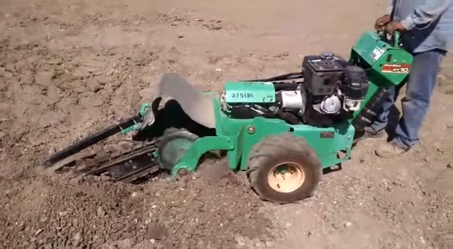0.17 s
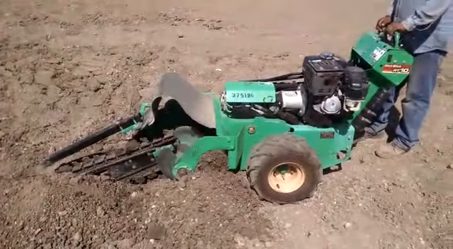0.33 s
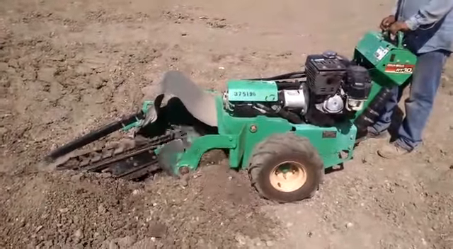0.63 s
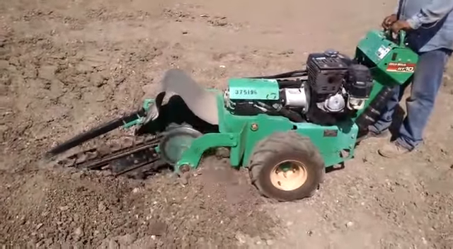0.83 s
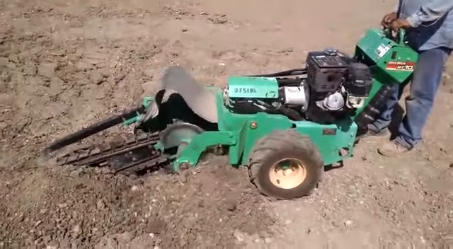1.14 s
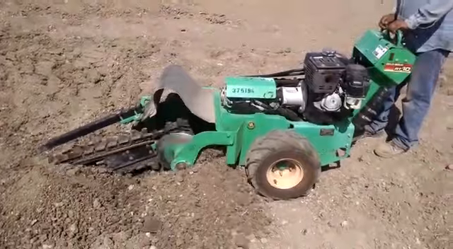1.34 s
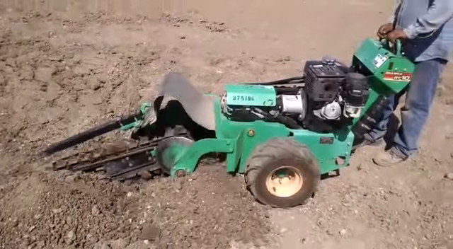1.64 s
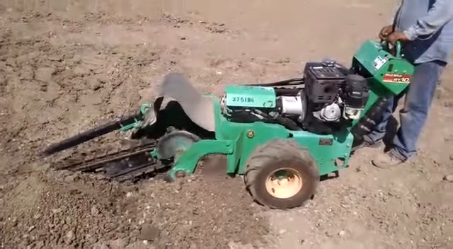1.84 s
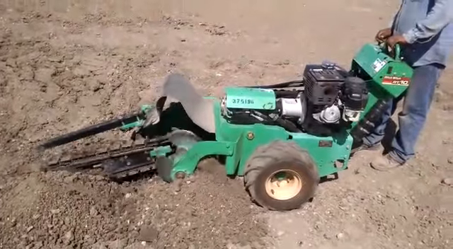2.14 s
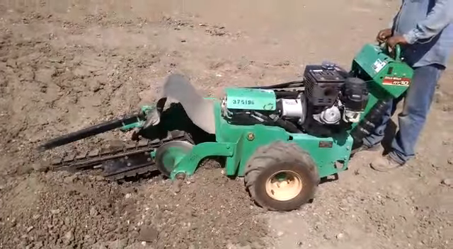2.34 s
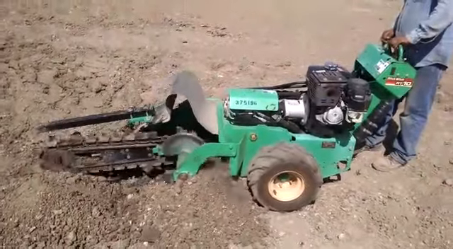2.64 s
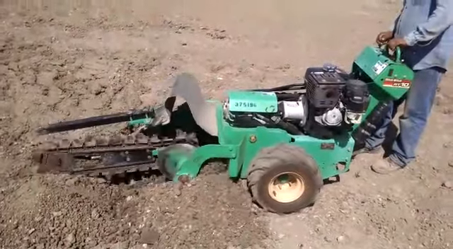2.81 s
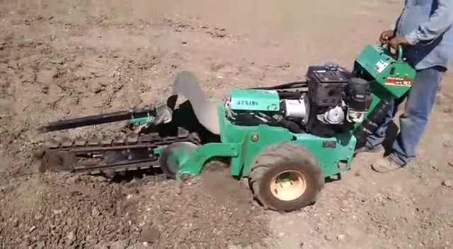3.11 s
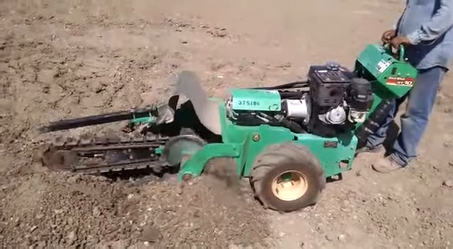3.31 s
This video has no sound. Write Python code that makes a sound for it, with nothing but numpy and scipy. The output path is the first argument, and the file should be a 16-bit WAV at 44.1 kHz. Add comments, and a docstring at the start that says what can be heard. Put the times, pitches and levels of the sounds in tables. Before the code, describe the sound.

Close outdoor stereo pickup of a trencher: rough, throaty small-engine putter throughout, metallic chain clatter and jingling links, brief tooth scrapes early, then wind rumble and pops around two seconds, engine surging near three.

```python
"""A single-cylinder four-stroke engine hunts in speed on a walk-behind trencher working in dry soil:
kicks timed by the engine cycle ring a muffler response, over a drone of low firing-rate multiples.
Shaped noise makes casing rasp, valve ticks, chain rattle and tooth scrapes; decaying sines make
the jingle of loose links and the clinks of stones. Low noise and short pressure pulses make wind
that buffets two close microphone ports in nearly opposite phase."""
import sys
import numpy as np
from scipy import signal
from scipy.fft import rfft, irfft, next_fast_len
from scipy.io import wavfile
from scipy.ndimage import uniform_filter1d, minimum_filter1d, map_coordinates

SR = 44100
rng = np.random.default_rng(int(sys.argv[2]) if len(sys.argv) > 2 else 0)


def wav_out(sig):
    """Save sig, one row per channel (or a flat mono array), as 16-bit PCM at SR to the path in sys.argv[1]."""
    wavfile.write(sys.argv[1], SR, np.round(np.clip(np.atleast_2d(sig).T, -1, 1) * 32767).astype(np.int16))


N = 153027


def amp(db):
    """Decibels to gain."""
    return 10 ** (np.asarray(db) / 20)


def unit(x):
    """Scale to rms 1."""
    return x / np.sqrt(np.mean(x ** 2) + 1e-20)


def along(points, hz):
    """Interpolate (Hz, value) points on a log frequency axis."""
    f, v = np.transpose(points)
    return np.interp(np.log(hz + 1), np.log(f + 1), v)


def curve(rows):
    """Interpolate (s, value) points to one value per sample."""
    return np.interp(np.arange(N) / SR, *np.transpose(rows))


def filtered(x, response):
    """Multiply the spectrum of x by a complex response of frequency."""
    m = next_fast_len(N + SR // 2)
    spectrum = rfft(x, m) * response(np.fft.rfftfreq(m, 1 / SR))
    return irfft(spectrum, m)[..., :N]


def shaped(x, points):
    """Filter x by a (Hz, dB) curve."""
    return filtered(x, lambda hz: amp(along(points, hz)))


def minimum_phase(points, size=8192):
    """Causal impulse response with the given (Hz, dB) spectrum, by cepstral folding."""
    cepstrum = irfft(np.log(amp(along(points, np.fft.rfftfreq(size, 1 / SR)))))
    cepstrum[1:size // 2] *= 2
    cepstrum[size // 2 + 1:] = 0
    return irfft(np.exp(rfft(cepstrum)))


def impulses(times_s, gains):
    """Single-sample kicks at the given times."""
    at = np.round(times_s * SR).astype(int)
    inside = (at >= 0) & (at < N)
    return np.bincount(at[inside], gains[inside], N)


def bumps(rows):
    """Gaussian swells, one per row of (centre s, level dB, half length s)."""
    t = np.arange(N) / SR
    return np.array([amp(db) * np.exp(-((t - s) / half_s) ** 2) for s, db, half_s in rows])


def fading(kicks, life_s):
    """Power envelope of kicks, falling to 1/e in life_s."""
    return signal.lfilter([1], [1, -np.exp(-1 / (life_s * SR))], kicks ** 2)


def wobble(knots_per_s):
    """Smooth random curve."""
    return map_coordinates(rng.standard_normal(1000), [np.arange(N) * knots_per_s / SR], mode="wrap")


def patchy(pair, depth_db):
    """Random gain patches, a few hundred Hz wide and some 40 ms long, alike on both sides."""
    z = signal.stft(pair, nperseg=512)[2]
    field = uniform_filter1d(rng.standard_normal(z.shape[1:]), size=4, axis=0)
    field = uniform_filter1d(field, size=7, axis=1)
    return signal.istft(z * amp(depth_db * unit(field)), nperseg=512)[1][:, :N]


# left-right likeness of machine noise: (frequency [Hz], likeness [-1..1])
MACHINE_LIKENESS = [(300, 0.5), (1200, 1), (2100, 0.7), (2650, 1), (3300, 0.42), (5000, 0.35),
                    (10000, 0.31)]


def noise_pair(likeness):
    """Left and right white noise whose likeness depends on frequency, from a mid and a side part."""
    def mid_side_gains(hz):
        turn = np.arccos(np.clip(along(likeness, hz), -1, 1)) / 2
        return np.array([np.cos(turn), np.sin(turn)])

    mid, side = filtered(rng.standard_normal((2, N)), mid_side_gains)
    return np.array([mid + side, mid - side])


# (frequency [Hz], left minus right [dB])
BALANCE = [(150, 14), (400, 3.5), (800, -2.5), (1250, -1), (1650, 2.5), (2400, 1), (3400, -2), (6000, -3),
           (9000, -3), (13000, -10)]


def placed(sound):
    """Left-right balance of the machine, by frequency."""
    return filtered(sound, lambda hz: amp(np.outer([.5, -.5], along(BALANCE, hz))))


# engine speed: (time [s], firing rate [1/s])
SPEED = [(0.0, 24.155), (0.131, 24.752), (0.324, 26.534), (0.483, 23.747), (0.668, 23.185), (0.755, 22.064),
         (1.176, 20.193), (1.367, 22.771), (1.54, 23.09), (1.743, 25.37), (1.937, 22.07), (2.306, 24.917),
         (2.381, 25.922), (2.574, 20.187), (2.872, 25.032), (3.039, 26.8), (3.152, 24.813), (3.47, 22.681)]
FIRST_FIRING_S = .0154


def engine_turns():
    """Engine cycles completed at each sample: the integral of the firing rate."""
    return np.cumsum(curve(SPEED)) / SR


def cycle_times(share):
    """Times at which the engine passes a given share of its cycle."""
    t = np.arange(N) / SR
    turns = engine_turns()
    turns -= np.interp(FIRST_FIRING_S, t, turns)
    return np.interp(np.arange(-1, int(turns[-1]) + 1) + share, turns, t, left=-1, right=-1)


def per_cycle(share, db, scatter_db):
    """One kick per engine cycle, uneven in size."""
    times_s = cycle_times(share)
    return impulses(times_s, amp(db + scatter_db * rng.standard_normal(len(times_s))))


def shaft_wave(multiple):
    """Sine locked to a multiple of the firing rate."""
    return np.sin(2 * np.pi * (multiple * engine_turns() + rng.random()))


# steady wind: (time [s], level [dB])
WIND_LEVEL = [(0, -28.5), (.55, -37), (.95, -25.5), (1.15, -35), (1.55, -18.5), (1.83, -23), (2.05, -17.5),
              (2.3, -20), (2.42, -27), (2.58, -29), (2.9, -24.5), (3.47, -21.5)]
# (time [s], level [dB], half length [s], splutter re rumble [dB])
BUFFETS = [(0.752, -12.5, 0.031, -31), (1.24, -10, 0.019, -14), (1.692, -2, 0.013, -14.5),
           (1.928, -10.5, 0.032, -8.5), (2.089, -16, 0.038, -4), (2.174, -9, 0.015, -7),
           (2.26, -12, 0.037, -2), (3.376, -16, 0.063, -8)]
# spectra: (frequency [Hz], level [dB per Hz])
WIND_SPECTRUM = [(15, -14), (45, -9), (85, 0), (200, -9), (350, -13.5), (600, -17.5), (1000, -82),
                 (2500, -70)]
SPLUTTER_SPECTRUM = [(60, -44), (180, -0.5), (350, 3.5), (650, -8.5), (1100, -17), (2500, -74)]
WIND_LIKENESS = -0.93  # nearly opposite phase


def wind(flutter_db=1.0, flutter_knots_per_s=30):
    """Turbulence on the ports: fluttering low rumble with sudden buffets that splutter into the midrange."""
    rumble = unit(shaped(noise_pair([(100, WIND_LIKENESS)]), WIND_SPECTRUM))
    splutter = unit(shaped(rng.standard_normal((2, N)), SPLUTTER_SPECTRUM))
    buffets = bumps([row[:3] for row in BUFFETS])
    splutter_gain = amp([row[-1] for row in BUFFETS]) @ buffets
    steady_gain = amp(curve(WIND_LEVEL) + flutter_db * wobble(flutter_knots_per_s))
    return rumble * np.hypot(steady_gain, buffets.sum(axis=0)) + splutter * splutter_gain


# (time [s], level [dB])
POPS = [(1.239, -3), (1.376, -7), (1.907, -5), (1.9195, 1), (2.09, -7), (2.2237, -4), (2.2689, -2)]
POP_HALF_S, POP_RIGHT_DB = 0.0017, -5


def pops():
    """Eddies hit the ports: a sharp push with recoil, opposite and weaker on the right."""
    t = np.arange(N) / SR
    push = np.zeros(N)
    for s, db in POPS:
        squared = ((t - s) / POP_HALF_S) ** 2
        push += amp(db) * (1 - 2 * squared) * np.exp(-squared)
    return np.array([push, -amp(POP_RIGHT_DB) * push])


# (time [s], level [dB], half length [s])
SCRAPES = [(0.238, -25.5, 0.027), (.55, -29, 0.054), (0.721, -25.5, 0.0088), (1.047, -24, 0.02),
           (2.835, -27.5, 0.02)]
# (frequency [Hz], level [dB per Hz])
GRIT_SPECTRUM = [(700, -44), (1900, 17.5), (3000, 9.5), (4300, 10), (5800, 6.5), (7500, -4), (15000, -40)]


def scrapes(grain_db=1.8, grain_knots_per_s=400):
    """Teeth drag through grit: short swells of noise with rapid random gain."""
    grains = patchy(noise_pair(MACHINE_LIKENESS), depth_db=0.5) * amp(grain_db * wobble(grain_knots_per_s))
    return unit(placed(shaped(grains, GRIT_SPECTRUM))) * bumps(SCRAPES).sum(axis=0)


JINGLE_LOW_HZ, JINGLE_HIGH_HZ, JINGLE_T60_S = 680.5, 2285, .08
JINGLE_RE_RASP_DB, JINGLE_TILT_DB = -8, -4  # level re RASP_LEVEL; tilt from lowest to highest pitch


def jingle(count=600):
    """Loose links ring at chance moments: decaying sines, each at its own pitch."""
    out, t = np.zeros(N + SR), np.arange(SR // 4) / SR
    for when, pitch, size in rng.random((count, 3)):
        hz = JINGLE_LOW_HZ * (JINGLE_HIGH_HZ / JINGLE_LOW_HZ) ** pitch
        decay = amp(JINGLE_TILT_DB * pitch + 2 * size - 60 * t / JINGLE_T60_S)
        out[int(when * N):][:len(t)] += np.sin(2 * np.pi * hz * t) * decay
    return unit(placed(out[:N])) * amp(curve(RASP_LEVEL) + JINGLE_RE_RASP_DB)


# stones and links on the boom: (time [s], level [dB], frequency [Hz], t60 [s])
CLINKS = [(.215, -20, 754, .2), (.225, -30, 5730, 0.14), (.545, -22.5, 720, 0.16), (1.214, -25, 1600, 0.07),
          (1.342, -20.5, 726, 0.24), (1.4411, -25, 14300, 0.071), (1.567, -24, 3795, 0.13),
          (2.4195, -22, 3140, 0.017), (2.6506, -21.5, 2120, 0.086), (2.825, -33, 4360, 0.16),
          (3.0012, -26, 3740, .17), (3.185, -30, 3386, 0.13), (3.3108, -18.5, 2100, 0.016)]
CRACK_RE_CLINK_DB, CRACK_T60_S = -2.5, 0.023


def clinks(spread=0.0027):
    """Stones and links strike the boom: a noise crack and three close decaying modes each."""
    out, t = np.zeros((2, N + SR)), np.arange(SR // 4) / SR
    noise = unit(shaped(noise_pair(MACHINE_LIKENESS), RATTLE_SPECTRUM))
    for s, db, hz, t60_s in CLINKS:
        at = round(s * SR)
        modes_hz = [hz * (1 + spread * k) for k in (-1, 0, 1)]
        cluster = unit(sum(np.sin(2 * np.pi * (f * t + rng.random())) for f in modes_hz))
        crack = np.roll(noise, -at, axis=1)[:, :len(t)] * amp(CRACK_RE_CLINK_DB - 60 * t / CRACK_T60_S)
        out[:, at:at + len(t)] += amp(db) * (cluster * amp(-60 * t / t60_s) + crack)
    return placed(out[:, :N])


# common level of rattle and steel, before their trims: (time [s], level [dB])
RATTLE_LEVEL = [(0, -35.5), (.62, -31.5), (.85, -37), (1.1, -34.5), (1.45, -30.5), (1.8, -36), (2.1, -36.5),
                (2.3, -40), (2.56, -38.5), (3, -33.5), (3.47, -34)]
RATTLE_TRIM_DB, STEEL_TRIM_DB = 3, -3.5
# (frequency [Hz], level [dB per Hz])
RATTLE_SPECTRUM = [(600, -29), (1700, 3), (3400, 2), (5300, -2.5), (6700, -3.5), (8500, -2), (10000, -7.5),
                   (12600, -10), (14200, -7), (16000, -15.5)]
# modes of casing and boom: (frequency [Hz], width [Hz], level [dB])
STEEL_MODES = [(927, 19, 5), (1914, 20, 3), (2316, 26, 8), (3403, 55, 5.5), (3804, 15, 3), (4240, 15, 4),
               (4650, 20, 4.5), (5703, 22, 0.5), (11610, 190, -3)]
# valve ticks, before VALVE_TRIM_DB: (share of cycle [0..1], level [dB])
VALVES = [(0.741, 1.5), (0.828, 4)]
VALVE_TRIM_DB, TICK_LIFE_S = 4, 0.0038
LINK_PEAK_DB, LINK_SPREAD_DB, LINK_LIFE_S, LINKS_PER_S = 1.5, 7, 0.016, 95
TEETH_PER_CYCLE = 0.35


def steel_response(hz):
    """Sum of band-pass resonances."""
    return sum(amp(db) * 1j * hz * width / (centre * centre - hz * hz + 1j * hz * width)
               for centre, width, db in STEEL_MODES)


def clatter(scrape_db=-1, tooth_db=-2.5, ring_floor_db=-2):
    """Valve ticks, chance chain knocks and a tooth-rate scrape gate noise into rattle and steel ring."""
    ticks = sum(per_cycle(share, VALVE_TRIM_DB + db, scatter_db=1.5) for share, db in VALVES)
    knock_gain = amp(LINK_PEAK_DB - LINK_SPREAD_DB * rng.random(N))
    knocks = (rng.random(N) < LINKS_PER_S / SR) * knock_gain
    scrape_power = amp(scrape_db + tooth_db * shaft_wave(TEETH_PER_CYCLE)) ** 2
    drive_power = scrape_power + fading(ticks, TICK_LIFE_S) + fading(knocks, LINK_LIFE_S)
    drive = patchy(noise_pair(MACHINE_LIKENESS), depth_db=3.0) * np.sqrt(drive_power)
    rattle = unit(placed(shaped(drive, RATTLE_SPECTRUM)))
    ring_power = amp(ring_floor_db) + fading(ticks + knocks, LINK_LIFE_S)
    ring_drive = noise_pair(MACHINE_LIKENESS) * np.sqrt(ring_power)
    ring = unit(placed(filtered(ring_drive, steel_response)))
    return amp(curve(RATTLE_LEVEL)) * (amp(RATTLE_TRIM_DB) * rattle + amp(STEEL_TRIM_DB) * ring)


# before RASP_TRIM_DB: (time [s], level [dB])
RASP_LEVEL = [(0, -28), (.28, -26), (.65, -26.5), (.85, -30), (1.39, -25), (2.6, -32.5), (2.83, -27),
              (3.47, -27.5)]
RASP_TRIM_DB = 2.5
# (frequency [Hz], level [dB per Hz])
RASP_SPECTRUM = [(30, -8), (90, -7), (250, 1), (380, 2), (560, 0), (720, 1.5), (1000, -0.5), (1300, -5),
                 (1700, -6.5), (2400, -12), (3500, -15.5), (8000, -26.5)]
# (share of cycle [0..1], level [dB])
SURGES = [(0, 2), (.33, -6), (.68, 1)]


def rasp():
    """Gas rush and casing noise: patchy noise that surges at set shares of each cycle."""
    surges = sum(per_cycle(share, db, scatter_db=2) for share, db in SURGES)
    swell = np.sqrt(1 + fading(surges, life_s=0.0025))
    rush = patchy(noise_pair(MACHINE_LIKENESS), depth_db=2.5) * swell
    return unit(placed(shaped(rush, RASP_SPECTRUM))) * amp(curve(RASP_LEVEL) + RASP_TRIM_DB)


# (multiple of firing rate, level [dB])
ORDERS = [(2, -41.5), (4, -41.5), (6, -49), (8, -44)]


def drone(waver_db=2.0, waver_knots_per_s=5.17):
    """Shaking of crank and piston: sines at low multiples of the firing rate, wavering in level."""
    return sum(amp(db + waver_db * wobble(waver_knots_per_s)) * unit(shaft_wave(round(k)))
               for k, db in ORDERS)


# before EXHAUST_TRIM_DB and pan: (time [s], level [dB])
EFFORT = [(0, -17.5), (.33, -16.5), (.68, -18.5), (.85, -21.5), (1.22, -19.5), (1.54, -16), (1.91, -20.5),
          (2.14, -19.5), (2.59, -23), (2.98, -15.5), (3.47, -20)]
EXHAUST_TRIM_DB, EXHAUST_PAN_DB = 0.5, -3  # pan: left gain, right opposite
# share of the cycle from blow-down to the piston's push
PUSH_SHARE = .288
# blow-down, piston push, intake: (share of cycle [0..1], level [dB], scatter [dB])
PUFFS = [(0, 4.6, -0.19), (PUSH_SHARE, -1.2, 0.26), (0.702, -12.5, 4)]
# (frequency [Hz], level [dB])
MUFFLER = [(20, -35), (48, -25), (160, -15), (265, -16), (305, 0.5), (385, 3), (490, -6), (570, -25.5),
           (690, -13), (950, -29.5), (1300, -35), (3000, -54)]
ECHO_DB, ECHO_T60_S = -17.5, 0.17


def exhaust():
    """Puffs of each cycle ring the muffler; machine and ground add a short, weak noise tail."""
    puffs = sum(per_cycle(*puff) for puff in PUFFS)
    thumps = signal.fftconvolve(puffs, minimum_phase(MUFFLER))[:N]
    t = np.arange(SR // 4) / SR
    tail = rng.standard_normal(len(t)) * amp(-60 * t / ECHO_T60_S)
    echo = signal.fftconvolve(thumps, tail)[:N]
    heard = unit(unit(thumps) + amp(ECHO_DB) * unit(echo))
    pan = amp(EXHAUST_PAN_DB * np.array([[1], [-1]]))
    return heard * amp(curve(EFFORT) + EXHAUST_TRIM_DB) * pan


# (frequency [Hz], left lead [rad])
PORT_PHASE = [(100, 0), (300, -1), (450, -1), (650, -.1), (1400, -.05), (2100, -1.4), (2620, -3.14),
              (3200, -4.3), (3600, -6.2), (4300, -6.5), (4900, -9.4), (6500, -12.5), (7600, -15.7),
              (9500, -19), (12000, -19.2), (15500, -25)]


def scene():
    """The machine reaches the two ports out of step; the wind acts right on them."""
    machine = exhaust() + drone() + rasp() + clatter() + jingle() + scrapes() + clinks()
    at_ports = filtered(machine, lambda hz: np.exp(1j * np.outer([1, 0], along(PORT_PHASE, hz))))
    return at_ports + wind() + pops()


CEILING, HOLD_S, TOP_HZ = .97, .006, 15650


def record(dry):
    """Fast limiter common to both channels, then a band limit at TOP_HZ."""
    size = int(HOLD_S * SR)
    needed = CEILING / np.maximum(np.abs(dry).max(axis=0), CEILING)
    gain = uniform_filter1d(minimum_filter1d(needed, size=size), size=size)
    return filtered(dry * gain, lambda hz: hz < TOP_HZ)


dry = scene()
out = record(dry)
wav_out(out)
```